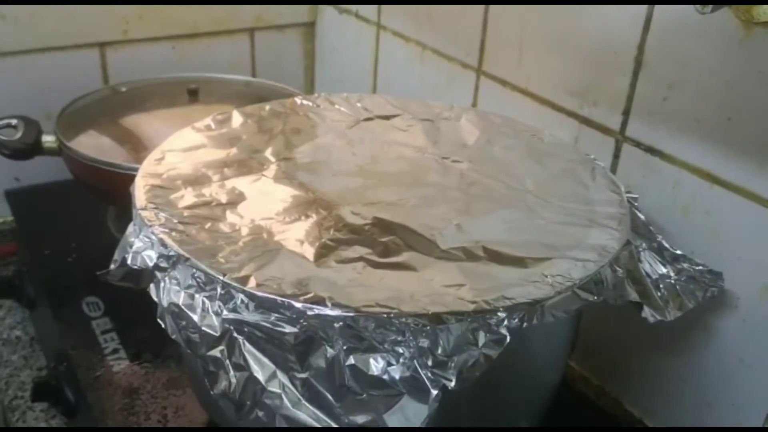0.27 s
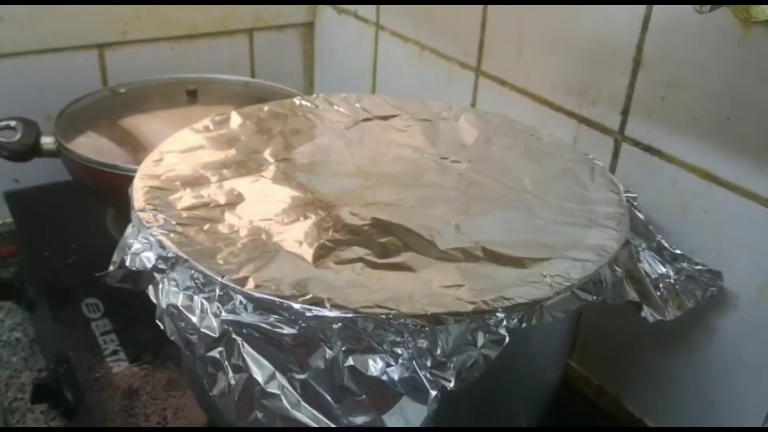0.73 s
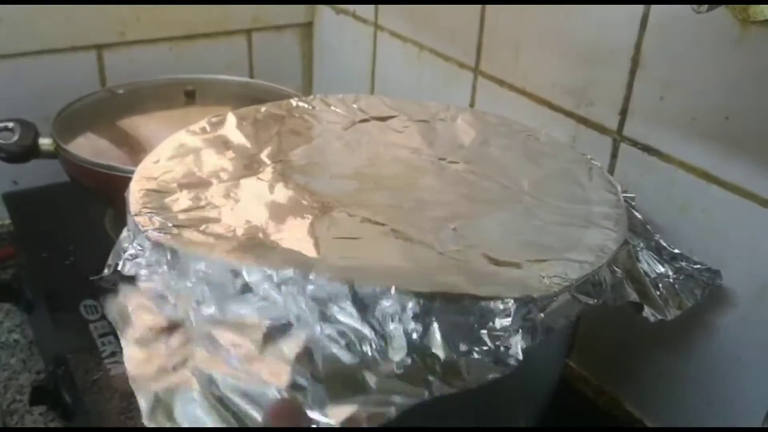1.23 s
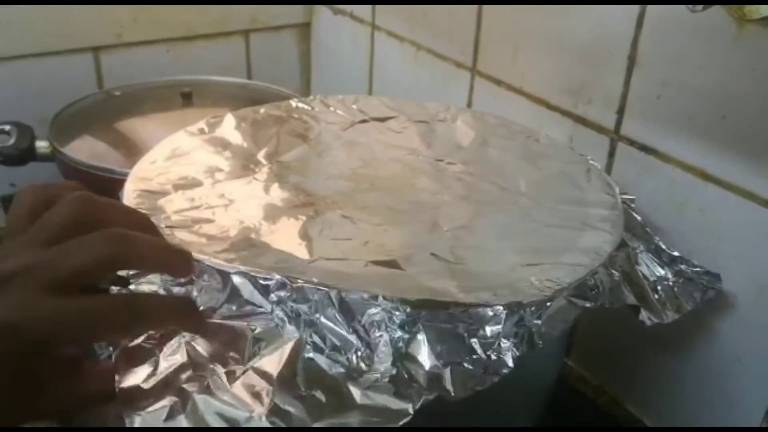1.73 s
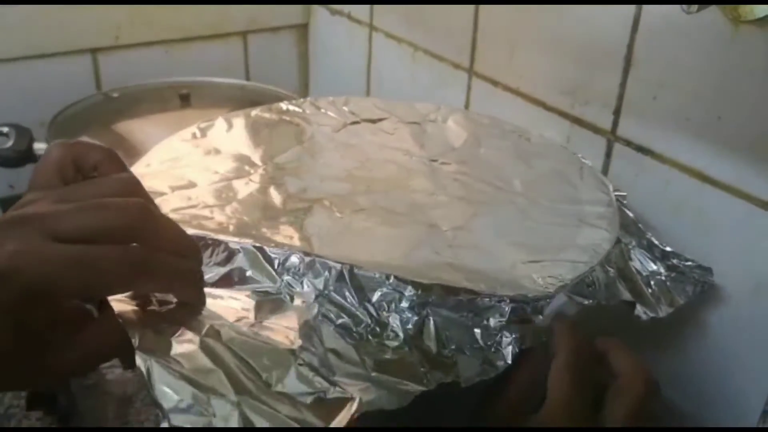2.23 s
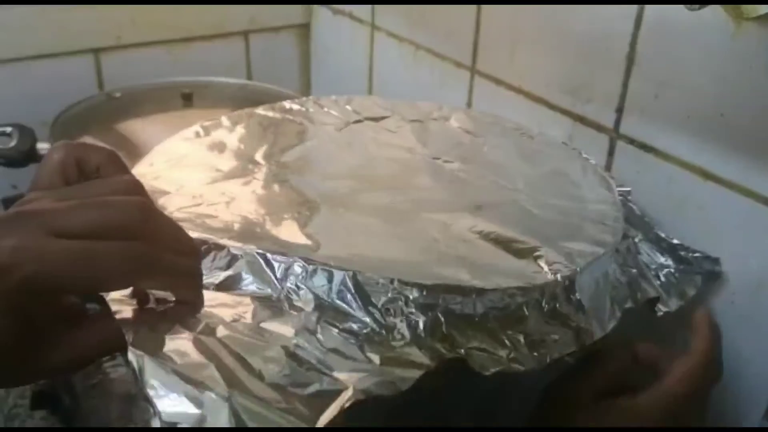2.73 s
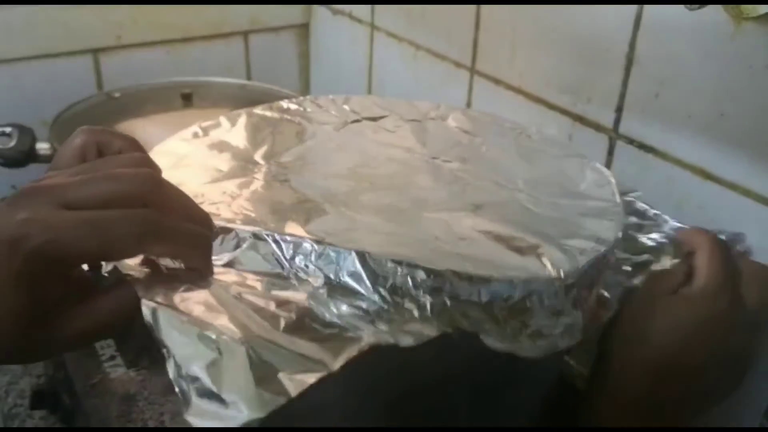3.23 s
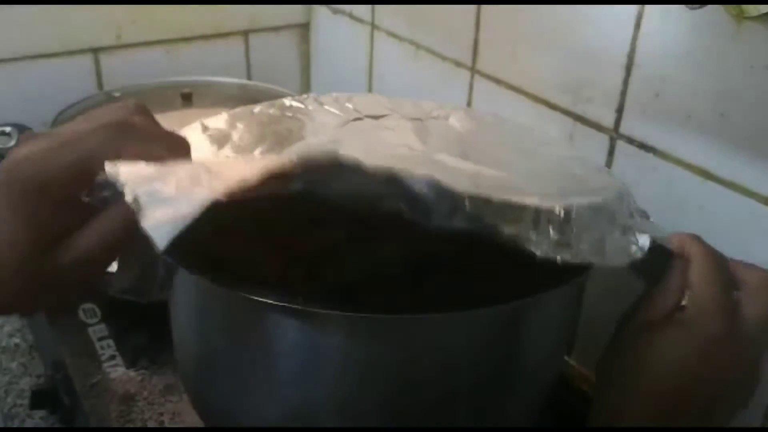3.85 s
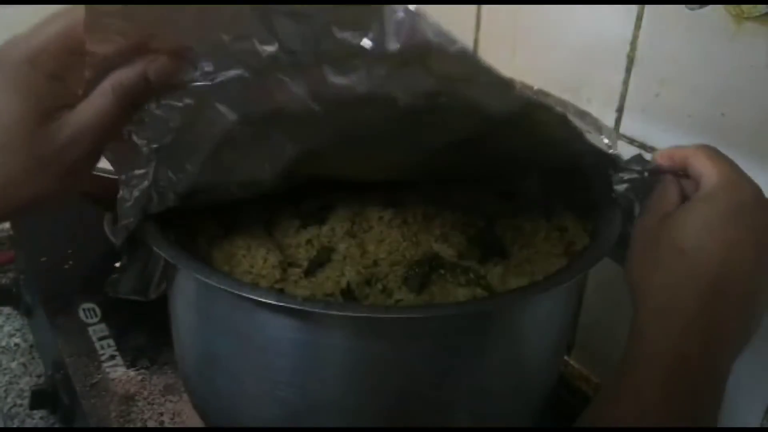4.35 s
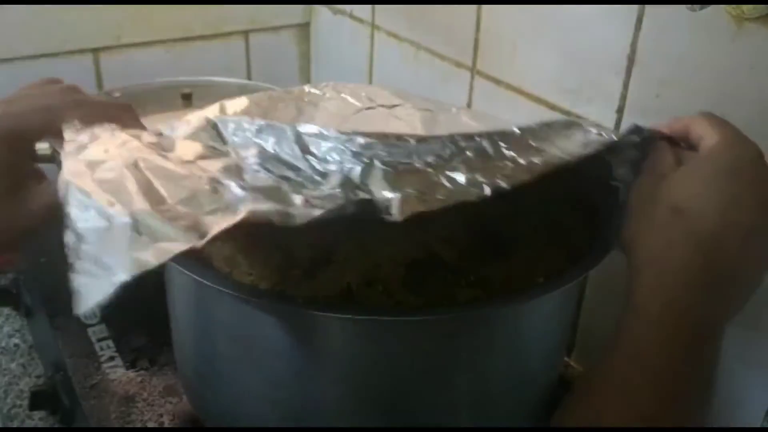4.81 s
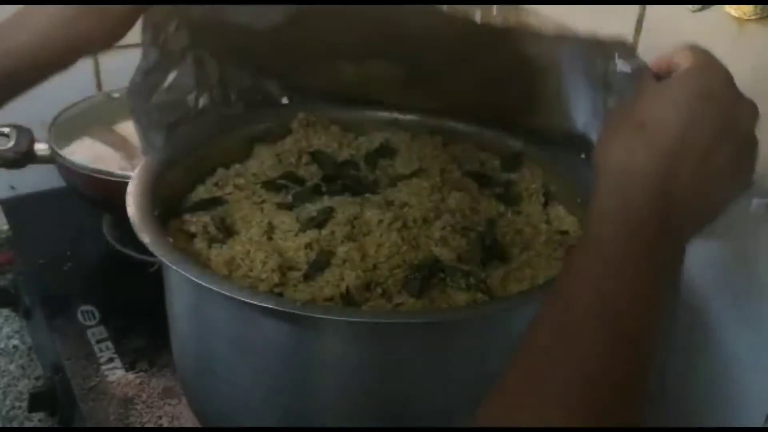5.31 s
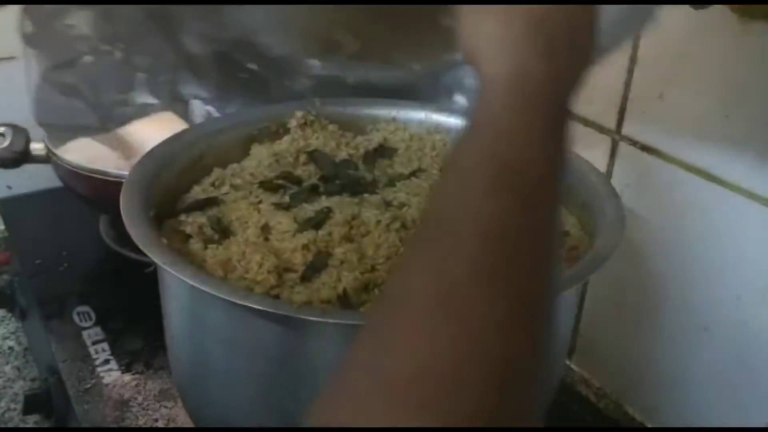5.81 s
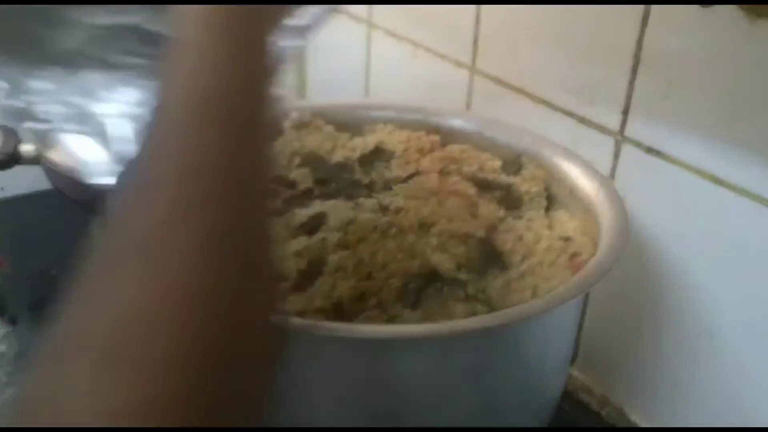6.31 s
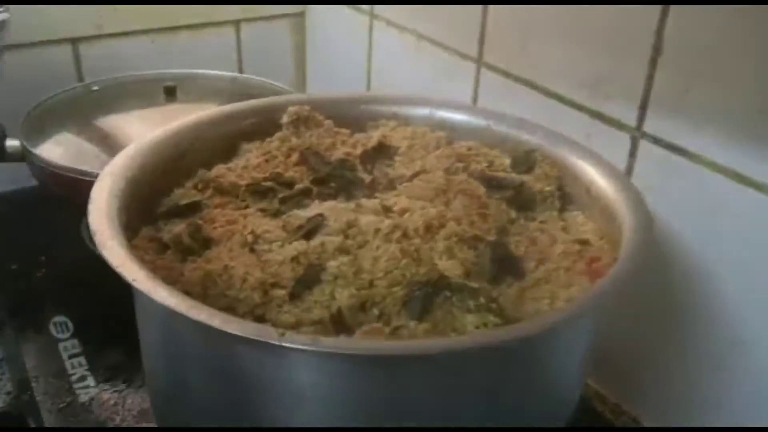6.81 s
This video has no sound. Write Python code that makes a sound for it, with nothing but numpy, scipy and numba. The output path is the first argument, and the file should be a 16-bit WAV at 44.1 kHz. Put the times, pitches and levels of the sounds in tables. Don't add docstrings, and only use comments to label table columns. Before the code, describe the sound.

After a second of quiet droning hum, foil rustles and crackles sharply in tugs while being lifted from a pot in a small tiled kitchen.

```python
import sys
import numpy as np
from scipy import signal
from scipy.fft import rfft, irfft, next_fast_len
from scipy.io import wavfile
from scipy.ndimage import uniform_filter1d, map_coordinates
from numba import njit

SR = 44100
rng = np.random.default_rng(int(sys.argv[2]) if len(sys.argv) > 2 else 0)


def magnitude_from_level(level_db):
    exponent = np.asarray(level_db, float) / 20
    return 10 ** exponent


def dump(signal):
    limited = np.clip(np.atleast_2d(signal).T, -1, 1)
    pcm = np.round(limited * 32767).astype(np.int16)
    wavfile.write(sys.argv[1], SR, pcm)


N = 311787


def unit(x):
    return x / np.sqrt(np.mean(x ** 2) + 1e-20)


def along(points, hz):
    f, v = np.transpose(points)
    return np.interp(np.log(hz + 1), np.log(f + 1), v)


def wobble(rate):
    at = np.arange(0, N + 64, 64)
    curve = map_coordinates(rng.standard_normal(200), [at * rate / SR])
    return np.interp(np.arange(N), at, curve)


def filtered(x, response):
    m = next_fast_len(N + 4096)
    hz = np.fft.rfftfreq(m, 1 / SR)
    return irfft(rfft(x, m) * response(hz), m)[..., :N]


def leaning(side):
    return lambda hz: magnitude_from_level(np.outer([.5, -.5], along(side, hz)))


# (frequency [Hz], width [Hz], level [dB])
WALL_MODES = [(41.3, 14, 23.5), (84.15, 3.23, 19), (164, 63, -15)]
# (multiple of the shaft rate, level [dB rms])
THROB = [(2, -60), (3, -43), (4, -40), (5, -46), (6, -50), (7, -38), (8, -52), (9, -57), (10, -53),
         (11, -59), (13, -60), (14, -57), (15, -58), (16, -55), (17, -60), (18, -63), (21, -59)]


def machine(first_s=.06, shaft_hz=12.166):
    t = np.arange(N) / SR - first_s + [[.00009], [-.00009]]

    def lag(f):
        total = 0
        for k, (centre, width, db) in enumerate(WALL_MODES):
            damping = 1j * f * width
            total += (-1) ** k * magnitude_from_level(db) * damping / (centre * centre - f * f + damping)
        return np.angle(total)

    out = 0
    for multiple, db in THROB:
        hz = multiple * shaft_hz
        out = out + np.sqrt(2) * magnitude_from_level(db + .5 * wobble(2)) * np.cos(2 * np.pi * hz * t + lag(hz))
    return out


# (frequency [Hz], level [dB rms], wander [Hz], left-right [dB])
TONES = [
    (100, -48, .1, 0),
    (414.5, -70, 3, 0),
    (1038, -64, 4, 8),
    (7628, -84, 3, 0),
    (14535, -92, 4, 0),
    (14707, -84, 2, 0),
    (15052, -93, 4, 0),
]


def tones():
    out = 0
    for hz, db, wander_hz, pan_db in TONES:
        turns = np.cumsum(hz + wander_hz * wobble(6)) / SR
        level_db = db + 2.0 * wobble(2.39) + [[pan_db / 2], [-pan_db / 2]]
        out = out + np.sqrt(2) * magnitude_from_level(level_db) * np.sin(2 * np.pi * (turns - [[0], [hz / 20000]]))
    return out


# (frequency [Hz], likeness [0-1])
ALIKE = [(40, .999), (70, .975), (130, 0.99), (290, 0.9), (430, .4), (650, .35), (800, .1), (900, 0),
         (1400, 0.28), (2600, 0.07), (15000, 0)]
# (frequency [Hz], phase [radians])
LEAD = [(130, 0), (250, .4), (320, .62), (430, 1.4), (650, 3), (900, 3), (901, 0)]


def rush(spectrum):
    def shares(hz):
        turn = np.arccos(np.clip(along(ALIKE, hz), -1, 1)) / 2
        return magnitude_from_level(along(spectrum, hz)) * [np.cos(turn), np.sin(turn)]

    mid, side = filtered(rng.standard_normal((2, N)), shares)
    ports = np.array([mid + side, mid - side])
    return unit(filtered(ports, lambda hz: np.exp(np.outer([.5j, -.5j], along(LEAD, hz)))))


# (frequency [Hz], level [dB per Hz])
RUMBLE = [(18, -7), (30, -11), (44, 0), (55, -9), (79, -14), (91, -7), (118, -12), (164, -6), (200, -13),
          (215, -20), (240, -13), (265, -19), (300, -16), (350, -22), (600, -42), (900, -120)]
# (time [s], level [dB])
RUMBLE_DRIFT = [(0, .5), (1.3, -0.5), (1.9, -1), (3.2, -0.5), (3.8, -2.5), (4.4, 0), (5.2, -0.5), (6, 0),
                (6.4, 1.5), (7.07, 0.5)]
# (frequency [Hz], level [dB per Hz])
HISS = [(240, -2), (430, -6.5), (650, -9.5), (800, -6), (1050, -7.5), (1400, -9), (1950, -5), (2600, -8.5),
        (3200, -16.5), (4400, -20), (5300, -19), (6300, -24.5), (7700, -16.5), (8400, -24.5), (9200, -28),
        (11000, -32.5), (13300, -40), (14700, -33)]
# (frequency [Hz], left-right [dB])
HISS_SIDE = [(290, 0), (520, 3), (900, 2.5), (1410, -1), (2300, -2), (3500, 1), (6820, -.5), (11500, -2),
             (15000, -1)]


def air():
    hiss = magnitude_from_level(-48.5 + 0.58 * wobble(2.46)) * filtered(rush(HISS), leaning(HISS_SIDE))
    drift_db = np.interp(np.arange(N) / SR, *np.transpose(RUMBLE_DRIFT)) + 0.96 * wobble(5.9)
    return magnitude_from_level(-39.5 + drift_db) * rush(RUMBLE) + hiss


@njit
def add(out, start, step, fade, gain, phase, end):
    for k in range(len(step)):
        turn = fade[k] * np.exp(1j * step[k])
        z = np.exp(1j * phase[k])
        room = out.shape[1] - max(start[0, k], start[1, k])
        for n in range(min(room, int(np.log(end) / np.log(fade[k])))):
            out[0, start[0, k] + n] += gain[0, k] * z.imag
            out[1, start[1, k] + n] += gain[1, k] * z.imag
            z *= turn


# (frequency [Hz], time to fall 60 dB [s])
RING = [(700, 0.097), (2200, 0.039), (7000, 0.064), (14000, 0.13)]


def buckle(s, db, count, spread_db, lag_s, run_s, ring=1):
    draw = rng.random((len(s), 4, count))
    hz = 450 + 15000 * draw[:, 0] ** 1.5
    t60 = ring * along(RING, hz) * (.5 + draw[:, 1])
    size = magnitude_from_level(db(hz) + spread_db * draw[:, 2]) / np.sqrt(t60 * count / 0.035)
    lag = lag_s * (.6 * draw[:, 3, :1] - .72)
    run = run_s * draw[:, 3] ** 2
    start = ((s[:, None] + run + np.array([lag, -lag])) * SR).astype(np.int64)
    phase = 2 * np.pi * rng.random(hz.shape)
    step = 2 * np.pi * hz / SR
    fade = magnitude_from_level(-60 / t60 / SR)
    out = np.zeros((2, N))
    add(out, start.reshape(2, -1), step.ravel(), fade.ravel(), size.reshape(2, -1), phase.ravel(), .03)
    return out


# (time [s], peak level [dB], pitch [Hz])
POPS = [(.207, -43, 2520), (.757, -43, 2288), (1.065, -45, 6750), (1.1428, -25, 2280), (1.345, -25, 2730),
        (1.4003, -27, 2300), (1.545, -41, 506), (2.0316, -31, 1250), (2.5949, -26.5, 1660),
        (2.6229, -28, 2220), (3.304, -23, 2240), (3.335, -31, 1870), (3.3803, -22, 1710),
        (3.5522, -22, 2680), (3.5786, -27, 1750), (3.7847, -38, 2060), (3.8567, -26.5, 1666),
        (4.125, -35, 2540), (4.3035, -30, 2870), (4.4234, -32, 1600), (4.5073, -26, 2240),
        (4.608, -31, 2800), (4.897, -30, 1700), (4.9401, -29.5, 2220), (5.1022, -32, 2340),
        (5.8605, -26, 2070), (5.9219, -26, 2140), (6.07, -35, 1150), (6.136, -38, 1125),
        (6.2314, -28, 2330), (.49, -48, 5600), (6.24, -28, 3680)]


def pops():
    s, peak_db, pitch_hz = np.transpose(POPS)

    def db(hz):
        near_db = np.maximum(-58 * np.abs(np.log2(hz / pitch_hz[:, None])), -32)
        return np.array([peak_db[:, None] + near_db] * 2)

    return magnitude_from_level(12.5) * buckle(s, db, count=120, spread_db=7.5, lag_s=.0006, run_s=0.00291)


# (frequency [Hz], level [dB per Hz])
SHEET = [(290, -47), (500, -23), (650, -9), (851, -4), (941, -4), (1070, -4), (1430, -4), (1750, -3),
         (4250, -10), (5130, -7), (6270, -8), (7670, -3), (10100, -17), (14600, -23), (15500, -35)]


def sheet_gain(hz):
    return magnitude_from_level(along(SHEET, hz))


ZONES = [900, 2200, 6300, 12500]


def separate_creases(table, ring, run_s):
    s, peak_db, patch_db, pan_db = np.transpose(table)

    def db(hz):
        colour = []
        for f, mid in zip(hz, patch_db):
            colour.append(along([(ZONES[0], -18.5), (ZONES[1], mid + 2), (ZONES[2], 0)], f))
        return np.array([np.array(colour) + (peak_db + way * pan_db / 2)[:, None] for way in (1, -1)])

    rung = buckle(s, db, count=140, spread_db=9, lag_s=.0006, run_s=run_s, ring=ring)
    return magnitude_from_level(2.5) * filtered(rung, sheet_gain)


# (time [s], peak level [dB], patch level re peak [dB], left-right [dB])
SNAPS = [(0.489, -45, -15, 2), (1.1164, -17, -38, 0), (1.1564, -17.5, -8, 3), (1.247, -23, -14, 6),
         (1.276, -23.5, -3, 0), (1.3999, -21.5, -13, 5), (1.432, -17, -9, 4), (1.5451, -41, 19, -13),
         (1.6227, -26.5, -1, 3), (1.662, -19, -11, 3), (1.7092, -35, -15, 6), (1.9413, -28, -3, 2),
         (1.9827, -28.5, -16, .5), (2.0325, -30, -8, 5), (2.2185, -33, -19, 2),
         (2.2834, -19.5, -3.5, 0), (2.3437, -25.5, -9, -3), (2.4394, -39, 3, 22), (2.5252, -26, -5, -1),
         (2.5682, -20.5, -16, 0), (2.6031, -15, -17, 1), (2.627, -19.5, -3, -10), (2.7695, -17, -28, 0),
         (3.195, -29, -0.5, 4), (3.226, -23.5, -1, 1), (3.2472, -22.5, -1, 2), (3.299, -19.5, 1, 2),
         (3.342, -32, 5, 6), (3.5104, -17, -10, -1), (3.789, -19.5, -9, 4),
         (3.8563, -34, -9, 2), (3.885, -20, -13, -2), (3.8977, -14.5, -18, 2), (3.978, -18, -4, -2),
              (4.1227, -26.5, -1, 3), (4.18, -22, -6, 1), (4.2389, -25, -23, -1), (4.2969, -26, 1, 0),
              (4.405, -24, 2, 2.5), (4.4164, -20, -20, 1), (4.6406, -17, -50, -1), (4.7018, -19, -11.5, 1),
              (4.8961, -26.5, 4.5, -1), (4.944, -23, -11, -3), (5.1667, -24.5, 3.5, -1),
              (5.2305, -26, -20, -3), (5.2778, -17.5, -15, 2), (5.348, -16.5, -23, -1),
              (5.437, -27, -23, 2), (5.51, -25, -2.5, .5), (5.697, -25, -0.5, -1), (5.767, -23, -4, 1),
              (5.8047, -24, -3, 0), (5.861, -37, 0, 4), (6.0531, -25.5, -5, 11), (6.0635, -23, -13, 1),
              (6.2375, -31, -2, 8), (6.466, -24, -35, 2), (6.5997, -23, -39, 3), (6.901, -43, -22.5, 4)]


def snaps():
    return separate_creases(SNAPS, ring=0.68, run_s=.006)


def moves(peak_s, level_db, rise_s, fall_s, swing_db=20, rounded=1.47):
    grid_s = np.arange(0, N / SR + .01, .001)
    t = grid_s[:, None] - peak_s
    away = np.where(t < 0, -t / rise_s, t / fall_s)
    power = magnitude_from_level(2 * (level_db - swing_db * away ** rounded)).sum(axis=1)
    return np.sqrt(np.interp(np.arange(N) / SR, grid_s, power))


# (peak time [s], level [dB], rise [s], fall [s], patch size [0-1])
TUGS = [(1.084, -50.5, 0.05, 0.041, 1), (1.135, -34, 0.032, 0.095, 0.55), (1.27, -42.5, 0.16, 0.2, 0.9),
        (1.42, -33, 0.29, 0.19, 0.45), (1.565, -44.5, 0.056, 0.15, 0.98), (1.2, -45, .06, .08, 0.83),
        (1.34, -41.5, 0.078, .08, .8), (1.48, -42.5, .06, .05, .8), (1.667, -40, .008, .04, 0.3),
        (1.715, -45, 0.03, 0.066, 0.6), (1.82, -59, .2, .2, 0.6), (1.96, -48, 0.047, 0.16, 0.5),
        (2.06, -43.5, 0.021, 0.18, 0.87), (2.239, -43.5, 0.028, 0.11, 0.62),
        (2.3, -48, 0.04, 0.29, 0.84), (2.48, -39.5, 0.11, 0.056, 0.6), (2.578, -37, 0.0098, 0.094, 0.05),
        (2.648, -27, 0.045, 0.027, 0.76), (2.764, -34.5, 0.25, 0.14, 0.67),
        (3.055, -56.5, 0.42, 0.035, 0.93), (3.21, -49, 0.035, 0.2, 0.3),
        (3.378, -27, 0.098, 0.026, 0.65), (3.45, -32.5, 0.068, 0.037, 0.64),
        (3.56, -31.5, 0.13, 0.13, 0.43), (3.73, -36, 0.45, 0.041, 0.57), (3.8, -35.5, 0.021, 0.17, 0.6),
        (3.91, -30, 0.11, 0.061, 0.76), (3.99, -33.5, 0.11, 0.082, 0.72),
        (4.1, -42, 0.18, 0.099, 0.78), (4.2, -44.5, 0.028, 0.32, 0.82), (4.33, -32, 0.089, 0.094, 0),
           (4.43, -36, 0.037, 0.67, 0.04), (4.64, -43.5, 0.5, 0.18, 0.73), (4.79, -40, 0.18, 0.052, 0.57),
           (4.95, -34.5, 0.082, 0.13, 0.71), (5.03, -36.5, 0.12, 0.095, .8), (5.2, -39.5, 0.21, 0.27, 0.6),
           (5.35, -38, 0.15, 0.13, 0.72), (5.55, -43, 0.18, 0.24, 0.67), (5.705, -48.5, .015, .07, .6),
           (5.785, -39.5, 0.032, 0.13, 0.43), (5.93, -37, 0.19, 0.15, 0.53), (6.065, -33.5, 0.037, 0.18, 0),
           (6.13, -38, 0.072, 0.11, 0.53), (6.19, -44, .06, 0.087, 0.94), (6.24, -39.5, 0.031, 0.027, 0.8),
           (6.29, -39.5, 0.046, 0.047, 0.67), (6.41, -51.5, 0.085, 0.2, 0.93),
           (6.49, -42.5, 0.032, 0.2, 0.43), (6.63, -45.5, 0.17, 0.25, 0.57), (7.03, -53, 0.16, 0.036, 0.93)]
# (peak time [s], level [dB],
# rise [s], fall [s])
FLEXES = [(1.43, -54, 0.065, 0.12), (1.57, -45, 0.082, 0.073), (2.045, -42, 0.017, 0.15),
          (2.66, -46.5, 0.071, 0.33), (3.38, -41, 0.083, 0.083), (3.56, -44, 0.067, 0.2),
          (3.96, -46.5, 0.26, 0.16), (4.32, -50.5, 0.097, 0.06), (4.6, -52.5, 0.25, 0.46),
          (4.93, -48.5, 0.11, 0.35), (5.2, -50, 0.2, 0.24), (5.43, -55, 0.24, 0.7),
          (5.87, -42.5, 0.028, 0.14), (6.07, -50, 0.053, 0.087), (6.14, -47.5, 0.12, 0.12),
          (6.25, -48, 0.11, .05), (7.068, -46, 0.013, .02)]


def crinkle(count=6000, scatter_db=2.5, clump_db=1, colour_db=4, click_db=9.5, click_grows=1.65):
    s = np.sort(rng.uniform(.9, N / SR, count))
    first = (s * SR).astype(int)
    size_db = scatter_db * np.minimum(rng.exponential(size=count), 3.6) + clump_db * wobble(25)[first]
    pitch_hz = 1500 * 6 ** rng.random((count, 1))

    def db(hz):
        return np.array([size_db[:, None] - colour_db * np.abs(np.log2(hz / pitch_hz))] * 2)

    sheet = buckle(s, db, count=20, spread_db=10.5, lag_s=.0008, run_s=.001, ring=0.76)
    click = magnitude_from_level(click_db + click_grows * size_db) * (-1.) ** np.arange(count)
    for port, late in enumerate((0, 27)):
        np.add.at(sheet[port], np.minimum(first + late, N - 1), click)
    sheet /= np.sqrt(np.abs(uniform_filter1d(np.mean(sheet ** 2, axis=0), size=3000)) + 1e-4)

    at, level_db, rise_s, fall_s, size = np.transpose(TUGS)
    creases = moves(at, level_db, rise_s, fall_s)
    patches = moves(at, level_db - 11.5 + 16 * size, rise_s, fall_s)
    panel = np.hypot(magnitude_from_level(-36) * creases, moves(*np.transpose(FLEXES)))
    sizzle = magnitude_from_level(-8) * creases
    out = 0
    for zone, gain in enumerate((panel, patches, creases, sizzle)):
        zone_curve = list(zip(ZONES, np.eye(4)[zone]))
        out = out + unit(filtered(sheet, lambda hz: along(zone_curve, hz) * sheet_gain(hz))) * gain
    return out


# (time [s], peak level [dB])
CRACKS = [(1.1182, -23), (1.664, -30), (1.7087, -30), (1.9425, -25), (2.0322, -29), (2.2185, -32),
          (2.5682, -40), (3.1945, -43), (3.2255, -32), (3.789, -39), (4.1797, -36), (5.2777, -18),
          (5.6961, -28), (5.7685, -38), (6.052, -21), (6.4669, -37), (6.6011, -38), (6.9, -54)]


def cracks():
    out, t = np.zeros(N + 200), np.arange(200) / SR
    for s, peak_db in CRACKS:
        out[round(s * SR):][:200] += magnitude_from_level(peak_db - 60 * t / 0.0017) * rng.standard_normal(200)
    ports = np.array([out, np.roll(out, 28)])[:, :N]
    bright = [(3000, -37), (8000, 2), (12000, 4.5), (15000, -3), (16500, 8), (17600, -30)]  # (Hz, dB)
    return filtered(ports, lambda hz: magnitude_from_level(along(bright, hz)))


# (time [s], peak level [dB], patch level re peak [dB], left-right [dB])
TICKS = [(1.1961, -30, 1, 2), (1.3672, -27, -10, 4), (1.678, -21, -6, -3), (1.711, -19, -10, 2),
         (1.9445, -34, -13, -7), (1.965, -34, -12, 0), (2.0325, -26.5, -4, -2), (2.2308, -34, -11, 3),
         (2.4223, -39, -8, 0), (2.4882, -33, -12, 5), (2.5755, -33, -10, 0), (2.655, -17, -8, 3),
         (2.757, -20, 2, -3), (3.0484, -35.5, -10, -2), (3.1372, -40.5, -6, 0), (3.36, -20, -7, -1),
         (3.384, -20, -8, -7), (3.585, -19.5, 0, 4), (4.8807, -34, -6, 2), (6.045, -25, -6, 0),
         (6.4666, -30, -17, -2), (6.519, -41, -16, 0), (6.8702, -44, -1, 2), (6.9969, -38.5, -10, 2)]


def ticks():
    return separate_creases(TICKS, ring=0.52, run_s=0.0012)


# (time [s], peak level [dB], pitch [Hz], time to fall 60 dB [s])
PINGS = [(1.43, -35, 2330, .04), (1.623, -31, 7000, .045), (2.288, -32, 7320, .045),
         (2.643, -31, 7970, .07), (2.745, -33, 1560, .08), (2.742, -29, 5060, .045), (2.77, -30, 6760, .05),
         (2.764, -35, 1910, .08), (3.336, -33, 2630, .07), (3.562, -33, 6890, .045),
         (3.788, -29, 5550, 0.041), (3.81, -34, 2070, .06), (3.887, -32, 2330, .04),
         (3.897, -23, 6930, .04), (3.903, -29, 2330, 0.074), (4.42, -32, 1583, 0.1),
         (4.423, -44, 2500, 0.044), (4.465, -39, 2350, .07), (4.506, -33, 2190, .06),
         (4.525, -41, 2330, .09), (4.557, -35, 4050, .04), (4.609, -33, 2830, .05),
         (4.938, -31, 2260, 0.051), (5.023, -28, 2210, .04), (5.276, -32, 7750, .045),
         (5.771, -30, 6730, 0.043), (5.86, -40, 1850, .04), (6.185, -36, 2670, 0.065),
         (6.237, -31, 7520, .06), (6.6, -42, 6900, .04), (6.748, -47, 2130, .09), (6.98, -45, 2150, .08),
         (6.232, -30, 2190, 0.057), (5.92, -34, 2200, .05), (6.145, -41, 1130, 0.065),
         (1.345, -29, 2800, .03), (3.304, -35, 2220, .03)]


def pings():
    out, t = np.zeros((2, N + 6000)), np.arange(6000) / SR
    for s, peak_db, hz, t60 in PINGS:
        swell = 1 - np.exp(-t / 0.00053)
        ping = magnitude_from_level(peak_db - 60 * t / t60) * swell * np.sin(2 * np.pi * hz * t)
        out[0, round(s * SR):][:len(t)] += ping
        out[1, round(s * SR + SR / hz * 1.2):][:len(t)] += ping
    return out[:, :N]


# (frequency [Hz], time to fall 60 dB [s])
KITCHEN = [(500, 0.11), (2000, 0.39), (7000, 0.24), (14000, 0.2)]


def kitchen(x):
    out, size = np.zeros((2, N + 2 * SR)), 16384
    for start in range(0, N, size):
        hz, t, z = signal.stft(rng.standard_normal((2, size)), SR, nperseg=256)
        dying = z * magnitude_from_level(-60 * t / along(KITCHEN, hz)[:, None])
        tail = signal.istft(dying, SR, nperseg=256)[1]
        wet = signal.fftconvolve(x[:, start:start + size], tail / np.linalg.norm(tail[0]), axes=1)
        out[:, start + 150:start + 150 + wet.shape[1]] += wet
    return out[:, :N]


# (frequency [Hz], left-right [dB])
FOIL_SIDE = [(60, 0.0), (240, -2), (950, 1), (3770, 2), (15000, -4)]


def scene():
    foil = magnitude_from_level(-3) * crinkle() + snaps() + pops() + cracks() + ticks()
    foil = filtered(foil, leaning(FOIL_SIDE))
    taut = pings()
    echo = magnitude_from_level(-2.0) * kitchen(foil + magnitude_from_level(-4) * taut)
    return foil + magnitude_from_level(2.5) * taut + echo + machine() + tones() + air()


def roll_off(x):
    return signal.sosfilt(signal.butter(12, 17300, fs=SR, output="sos"), x)


def record(dry):
    heard = filtered(dry, lambda hz: .03 * (hz < 17300) + 1 / (1 + (hz / 15150) ** 300))
    return roll_off(heard)


dry = scene()
out = record(dry)
dump(out)
```